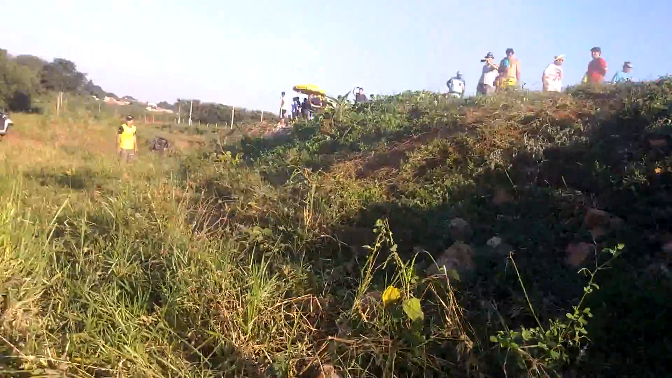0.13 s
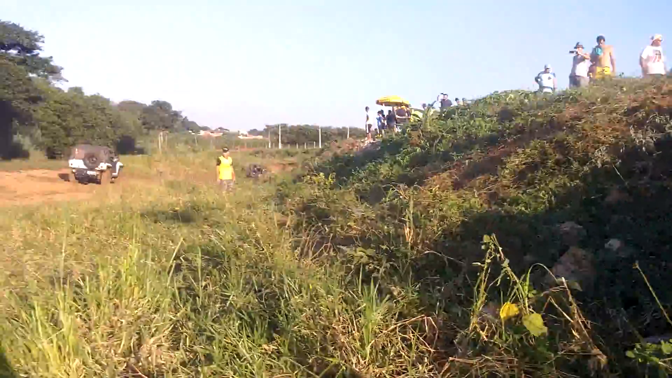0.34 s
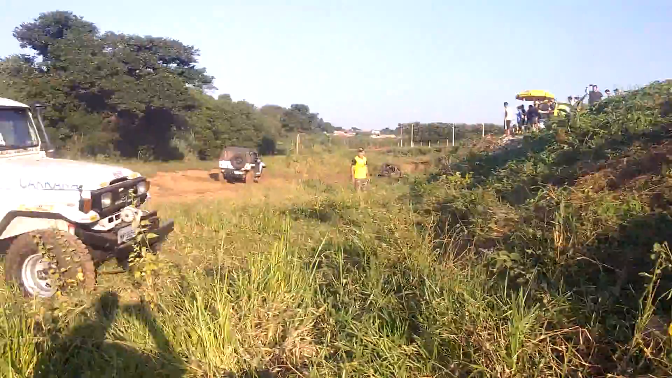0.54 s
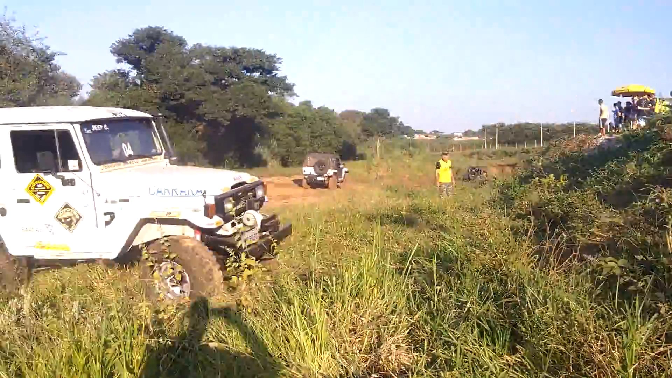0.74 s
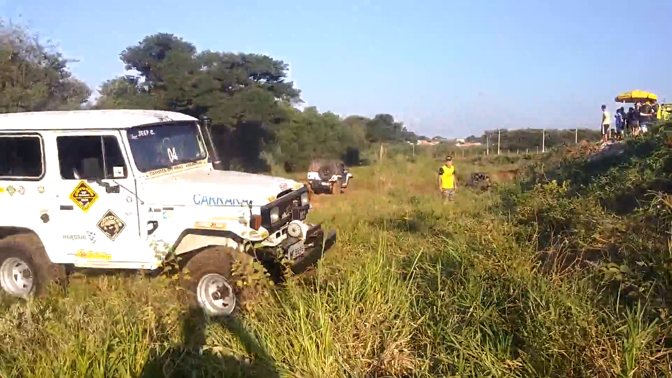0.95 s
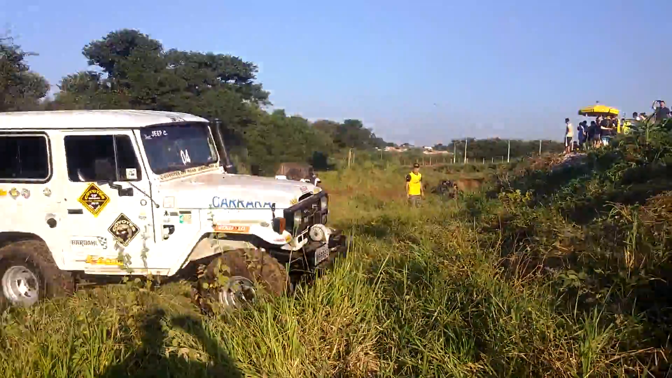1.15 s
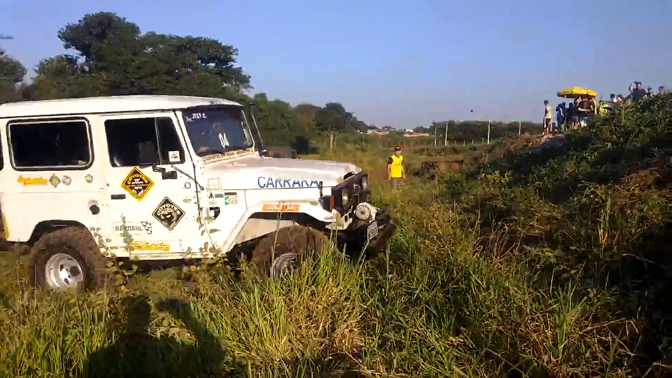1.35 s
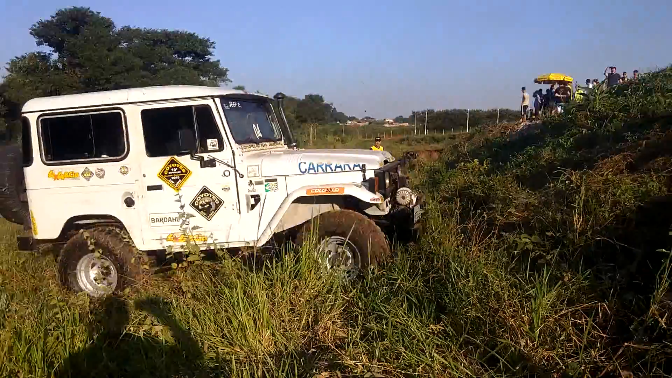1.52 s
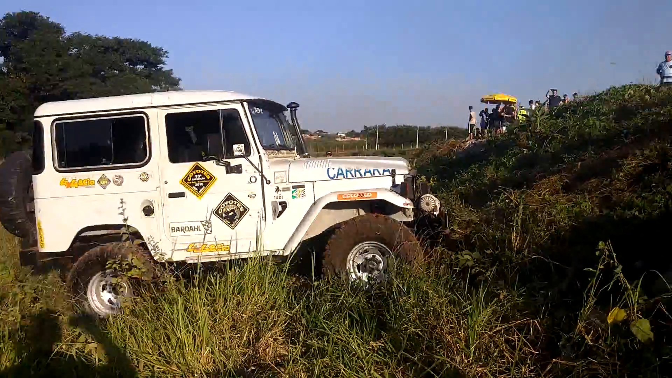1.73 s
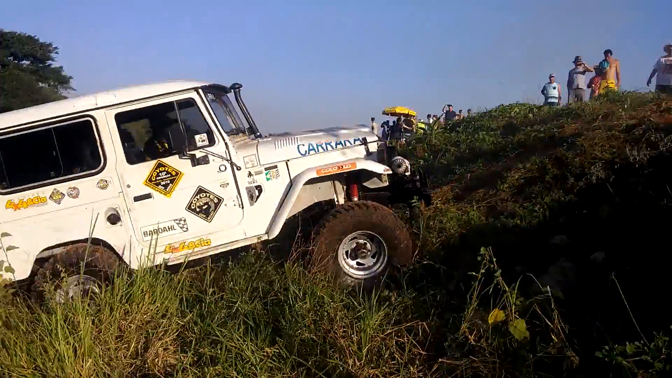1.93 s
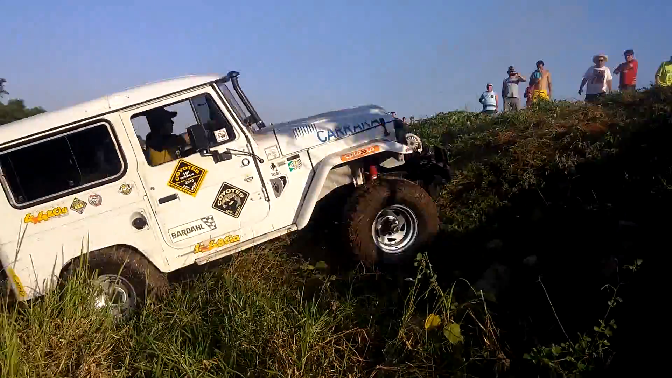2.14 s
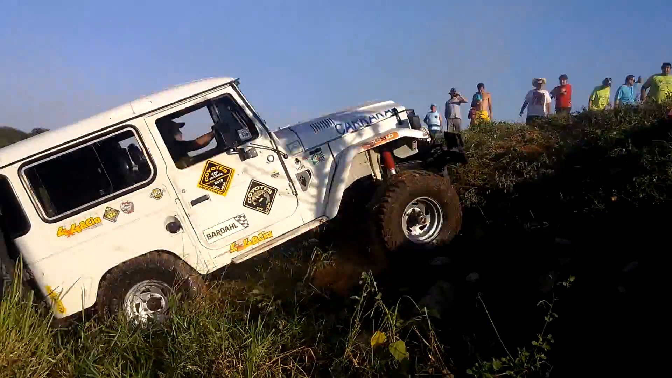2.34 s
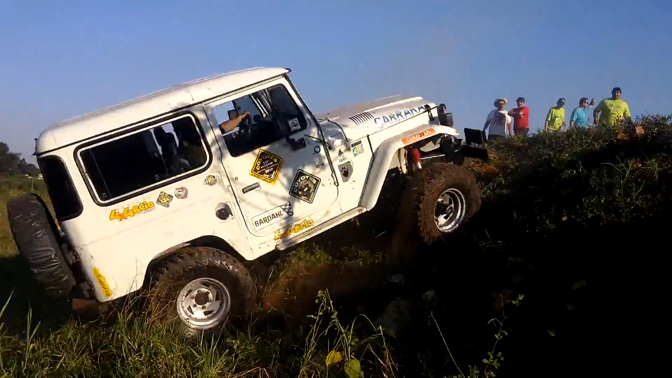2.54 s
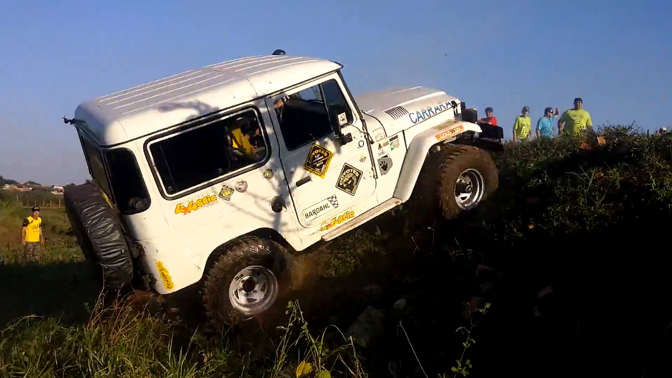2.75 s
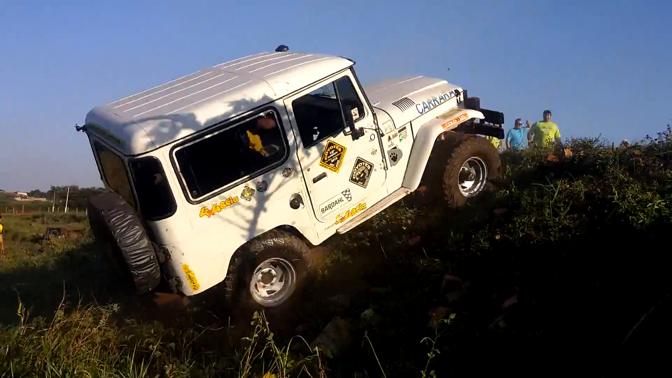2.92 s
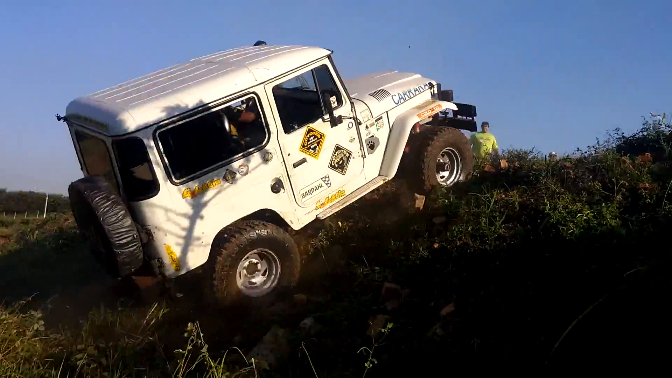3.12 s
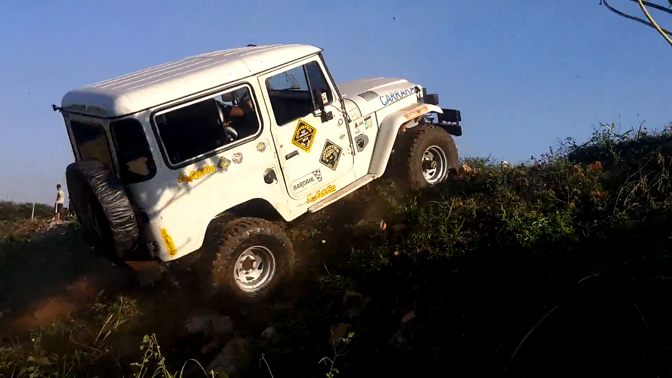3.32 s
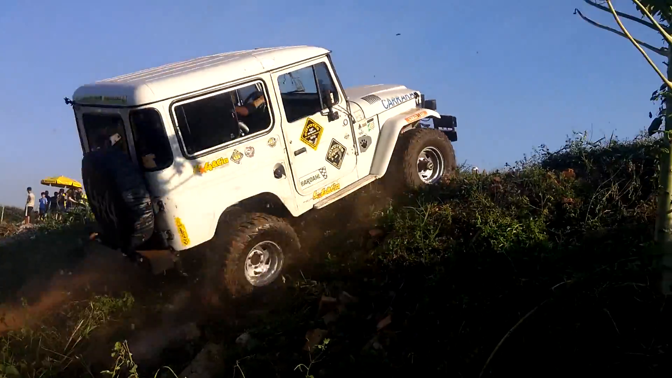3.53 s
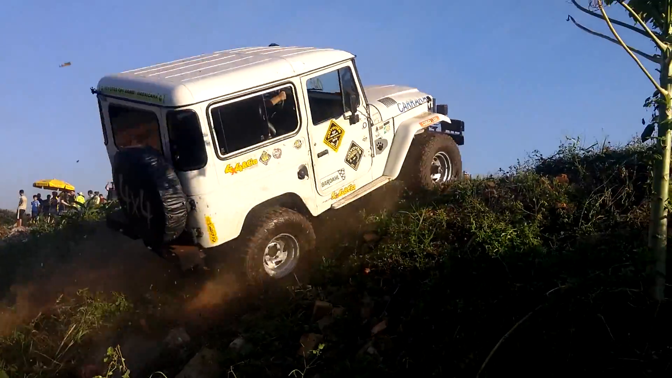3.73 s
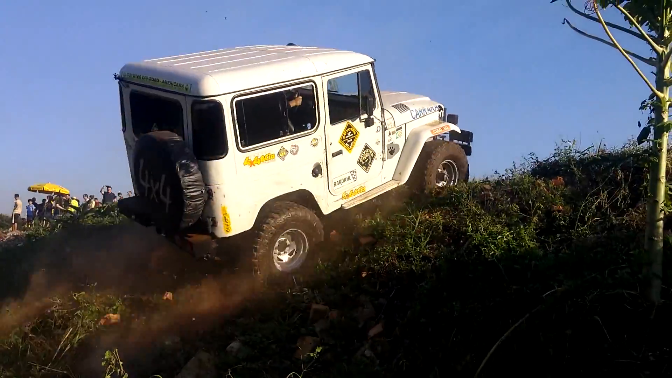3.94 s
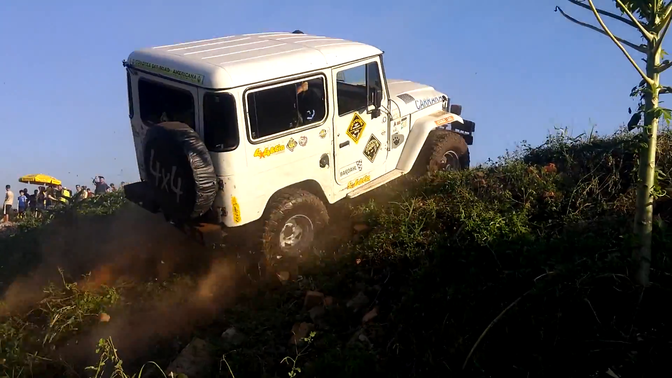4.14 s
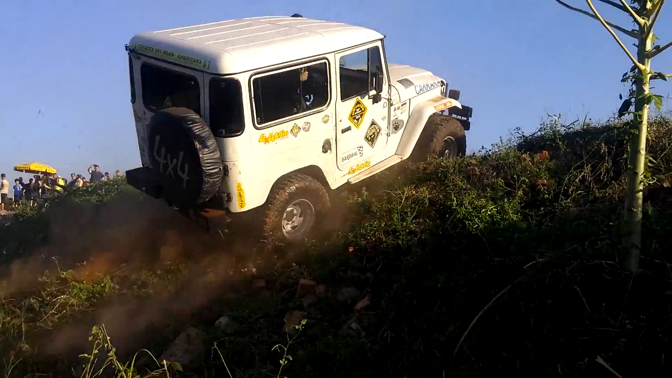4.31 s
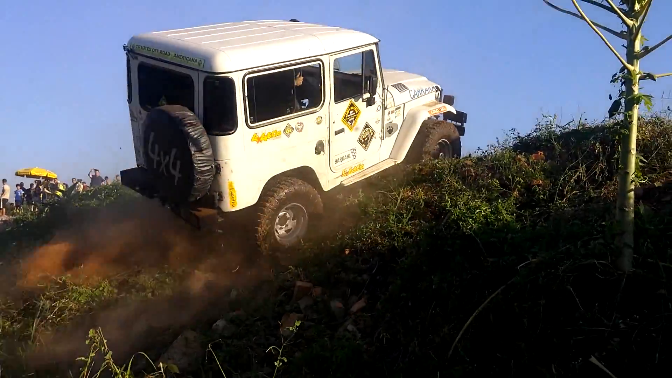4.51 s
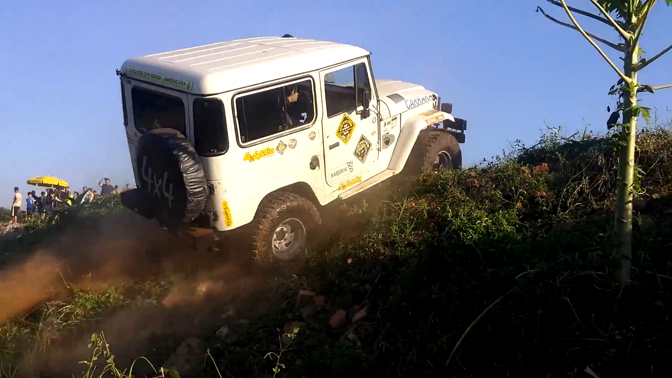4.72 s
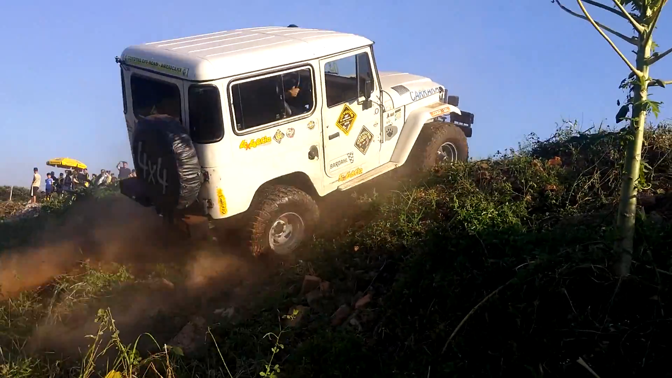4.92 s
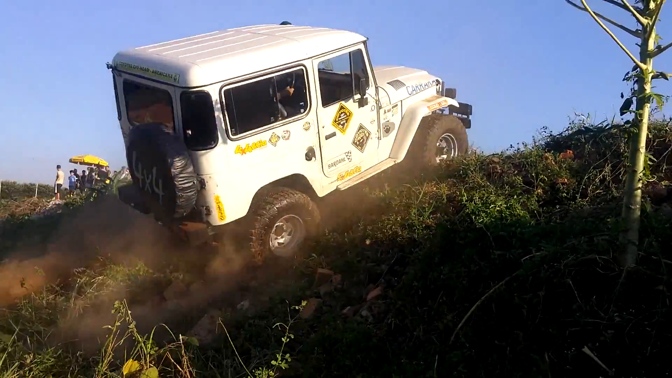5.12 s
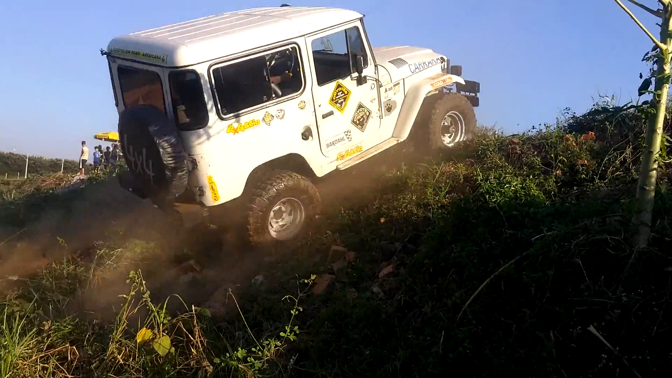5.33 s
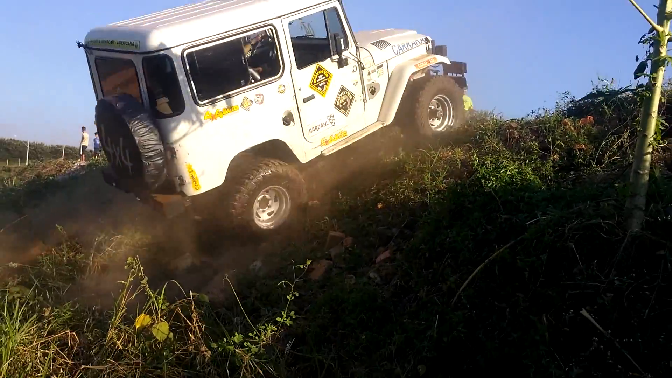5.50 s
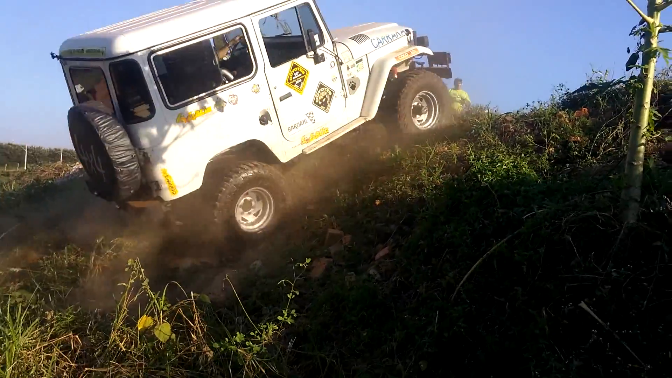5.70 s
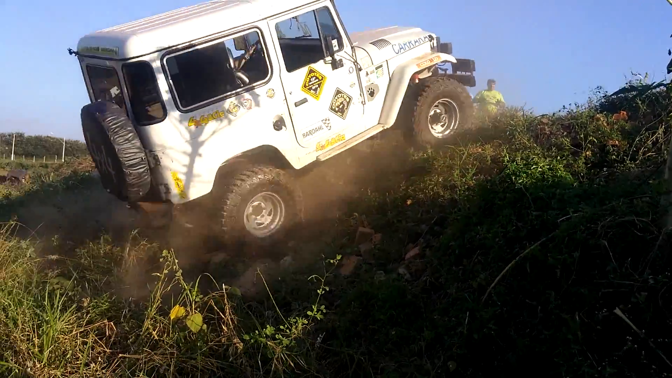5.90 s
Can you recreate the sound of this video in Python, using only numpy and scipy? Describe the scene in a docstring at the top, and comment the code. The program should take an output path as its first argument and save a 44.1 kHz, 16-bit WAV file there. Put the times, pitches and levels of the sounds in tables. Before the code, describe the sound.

Open air, close to the vehicle, with a slightly overloaded microphone and duller left side. At 0 s a short gust rumbles over a rough diesel at low revs; the boom stumbles near 0.2 s, then swells from 0.4 to 0.8 s with knocks, clatter and small snaps. Around 0.9 to 1.2 s revs and boom dip; hiss of fan, tyres and grass rises, strongest near 1.3 s. From 1.4 s the engine pulls hard, booming loudest around 1.8 s, with tiny squeaks at 1.75 and 2.07 s and snaps around 2 to 2.3 s. Pitch climbs until 3.1 s, while clatter recedes. A low thud at 3.17 s precedes bursts of earth drumming on panels, densest 3.5 to 3.9 s. Stones snap until 4.5 s over steady high revs. After a hiccup at 4.85 s the engine winds down, quiet and dull, its drone slightly returning by 6 s.

```python
"""Diesel off-roader climbing a dirt bank

A four-cylinder diesel off-roader passes close by and claws up a dirt bank outdoors.
Exhaust tones boom at multiples of the firing rate; coloured noises that flare at each firing make the
drone and clatter, a steady one the low roar, and damped pings the knocks. Fan, tyres and grass hiss, wind
rumbles on the microphone, thrown earth rings the panels, stones and stalks snap. The left of the two ports
is shadowed in the treble.
"""
import sys
import numpy as np
from scipy import signal
from scipy.fft import rfft, irfft, next_fast_len
from scipy.io import wavfile
from scipy.ndimage import uniform_filter1d, map_coordinates

SR = 44100
rng = np.random.default_rng(int(sys.argv[2]) if len(sys.argv) > 2 else 0)


def transcribe(signal):
    """Save signal, clipped to [-1, 1], as a 16-bit WAV file at the path in sys.argv[1]."""
    frames = np.atleast_2d(signal).T
    limited = np.clip(frames, -1, 1)
    pcm = np.round(limited * 32767).astype(np.int16)
    wavfile.write(sys.argv[1], SR, pcm)


N = 267246
TIME = np.arange(N) / SR  # s


def gain_of(db):
    """Amplitude factor of a level in dB."""
    return 10 ** (np.asarray(db) / 20)


def evened(x):
    """Scale a signal to an rms of 1."""
    return x / np.sqrt(np.mean(x ** 2) + 1e-20)


def read(points, hz):
    """Read a spectrum at the frequencies hz, interpolating along log frequency."""
    f, value = np.transpose(points)
    return np.interp(np.log(hz + 1), np.log(f + 1), value)


def columns(rows):
    """The columns of a time curve, read at every sample."""
    s, *rest = np.transpose(rows)
    return [np.interp(TIME, s, c) for c in rest]


def add(mix, s, sound):
    """Lay a sound into the mix at s seconds, cut at the end."""
    part = mix[:, round(s * SR):][:, :sound.shape[-1]]
    part += sound[..., :part.shape[1]]


def bursts(rows):
    """Level in dB of the loudest burst at every sample: quick rise, hold, steady fall."""
    rise = 2000  # dB per s
    levels = [db + np.minimum(0, np.minimum(rise * (TIME - s), fall * (s + hold - TIME)))
              for s, hold, db, fall in rows]
    return np.max(levels, 0)


# When each side of the vehicle faces the microphone: side: (from t/s, to t/s)
FACING = {"nose": (-.2, .8), "wing": (-.1, 1.6), "flank": (.85, 2.5), "tail": (4.7, 6.3),
          "underside": (.75, 3.6), "bonnet": (.78, 1.45), "grille": (.8, 1.35), "bumper": (.35, .9),
          "tailpipe": (5.68, 6.3), "rear wheel": (4.5, 5.55)}


def facing(side, s):
    """How fully a side faces the microphone, 0-1, with 0.15 s ramps."""
    start, end = FACING[side]
    return np.clip(np.minimum(s - start, end - s) / .15, 0, 1)


# How much of the vehicle is seen from behind, first less, then ever more: (t/s, share)
SEEN_FROM_BEHIND = [(0, 0.5), (.8, 0.074), (1.2, 0.54), (2, 0.69), (6.06, 1)]


def rear_share(s):
    """Share of the vehicle seen from behind, 0-1."""
    return np.clip(np.interp(s, *np.transpose(SEEN_FROM_BEHIND)), 0, 1)


# How near and hard-working the engine is: (t/s, body drone level/dB)
NEAR = [(0, -27.5), (.5, -25), (.82, -27), (.92, -26), (1.4, -22.5), (1.75, -24), (2.9, -33.5), (3.6, -33),
        (4.42, -37.5), (4.72, -37), (5.16, -45.5), (5.65, -50.5), (5.85, -44.5), (6.06, -41)]
LOUD_DB = -23  # the drone level that counts as near


def nearness():
    """Drone level in dB above the near level; the other engine layers follow it."""
    return columns(NEAR)[0] - LOUD_DB


# Panels and block ringing while their side faces us, and a band dipped by the ground echo (negative lift):
# (f/Hz, width/Hz, lift/dB, side)
RINGS = [(1188, 45, 9, "bumper"), (2350, 450, 13, "nose"), (2850, 600, 5, "bonnet"),
         (14800, 3000, 5, "bonnet"), (3300, 700, 5, "underside"), (880, 60, 6, "wing"),
         (1315, 45, 6, "wing"), (6000, 2500, 5, "nose"), (1735, 60, 6, "nose"), (1915, 45, 8, "wing"),
         (762, 45, 6, "flank"), (1455, 60, 5, "flank"), (680, 170, 7, "tail"), (1930, 70, 8, "rear wheel"),
         (1800, 1600, 6, "tailpipe"), (310, 80, 5, "tail"), (1480, 60, 6, "tail"),
         (440, 140, -7, "underside")]


def noise(colour, patchy_db, ring=False, size=1024):
    """Two unrelated noises with drifting patches; the colour turns from front to rear, rings come and go."""
    frames, hz = N * 4 // size + 5, np.fft.rfftfreq(size, 1 / SR)
    a, b, c, d, patches = rng.standard_normal((frames, len(hz), 5)).T
    s, colour = np.arange(frames) * size / 4 / SR, np.array(colour)
    rear = rear_share(s)
    front_db = read(colour[:, :2], hz)[:, None]
    rear_db = read(colour[:, [0, -1]], hz)[:, None]  # the front colour again if there is only one
    db = front_db * (1 - rear) + rear_db * rear

    # the rings wander slowly at random in pitch and strength
    drift, swell = .005, .25  # shares
    wander = rng.standard_normal((frames, len(RINGS), 2))
    wander = evened(uniform_filter1d(wander, size=16384 // size, axis=0))
    for k, (f, width, lift_db, side) in enumerate(RINGS if ring else []):
        off = (hz[:, None] - f * (1 + drift * wander[:, k, 0])) / (width / 2)
        lift = lift_db * (1 + swell * wander[:, k, 1]) * facing(side, s)
        db = db + lift / (1 + off ** 2)

    shape = gain_of(db) / np.sqrt(np.mean(gain_of(2 * db), 0))  # same power in every frame
    patches = uniform_filter1d(patches, size=9216 // size, axis=1)
    patches = evened(uniform_filter1d(patches, size=size // 100, axis=0))
    z = np.array([a + 1j * b, c + 1j * d]) * shape * gain_of(patchy_db * patches)
    return evened(signal.istft(z, nperseg=size, noverlap=size * 3 // 4)[1][:, :N])


# Gusts: (t/s, hold/s, level/dB, fall/dB per s)
GUSTS = [(-.1, 0.071, -18, 38), (1.45, 0.96, -33.5, 102)]
# Colour of the wind: (f/Hz, level/dB per Hz)
WIND_COLOUR = [(2, 0.5), (20, -10.5), (32, 14), (45, -29), (300, -98)]


def wind():
    """Wind on the microphone: deep patchy noise, gusting over a steadily calming floor."""
    floor_db, calming = -32, -18  # dB at the start, dB per s
    level_db = np.maximum(bursts(GUSTS), floor_db + calming * TIME)
    return gain_of(level_db) * noise(WIND_COLOUR, 5, size=4096)


# Hiss, rising in steps as the flank comes by: (t/s, level/dB)
HISS = [(0, -43), (.15, -53.5), (.4, -77), (.42, -49.5), (.72, -44), (.84, -44), (.88, -36), (1.3, -31),
        (2, -40), (2.9, -49.5), (3.3, -50.5), (3.55, -46), (4.8, -53), (5.1, -61.5), (5.35, -76),
        (6.06, -71.5)]
# Colour of the hiss: (f/Hz, front level/dB per Hz, rear level/dB per Hz)
HISS_COLOUR = [(2500, -44, -51), (4100, -12.5, -38), (4770, 0.5, -18), (6000, 2.5, -9), (7820, 9.5, -1),
               (9900, 19, 5.5), (10320, 3, 7.5), (14000, -20.5, -17.5), (15800, -21.5, -21.5)]


def hiss(flare):
    """Fan, tyres and grass: bright noise, slightly pulsed by the firing."""
    return gain_of(columns(HISS)[0]) * noise(HISS_COLOUR, 1.6, ring=True, size=256) * evened(1 + .6 * flare)


# A clod on the underside: (t/s, level before attack and decay/dB, f/Hz, t60/s)
THUMP = (3.165, -15, 205, .11)


def thump():
    """A clod thuds on the underside: one low, quickly damped ring."""
    s, db, hz, t60 = THUMP
    t, out = np.arange(6000) / SR, np.zeros((2, N))
    attack = np.minimum(t / 0.0044, 1)
    add(out[:1], s, attack * gain_of(db - 60 * t / t60) * np.sin(2 * np.pi * hz * t))
    return out


# Throws of earth from the spinning wheel: (t/s, hold/s, level/dB, fall/dB per s)
SPRAY = [(3.172, 0.011, -43, 147), (3.474, .04, -29.5, 203), (3.519, 0.036, -22.5, 298),
         (3.598, 0.044, -28, 198), (3.789, 0.13, -31, 119), (4.211, 0.008, -36, 600),
         (4.362, 0.005, -39, 600), (3.678, 0.078, -32, 200)]
# Dull modes of the panels: (f/Hz, width/Hz, level/dB)
PANEL = [(270, 120, -4), (430, 160, -3), (690, 110, 0), (1480, 500, 6)]


def spray():
    """The spinning wheel throws clods of all sizes, which ring the damped modes of the panels."""
    t, clods_per_s = np.arange(1500) / SR, 450
    grid = (len(PANEL), 2, N)
    clods = gain_of(3 * rng.standard_normal(grid)) * (rng.random(grid) < clods_per_s / SR)
    starts = np.round(np.array(SPRAY)[:, 0] * SR).astype(int)
    clods[..., starts + 40] = gain_of(10)  # a large clod opens each throw
    rung = 0
    for hits, (hz, width, db) in zip(clods, PANEL):
        mode = np.minimum(t / 0.00093, 1) * np.exp(-np.pi * width * t) * np.sin(2 * np.pi * hz * t)
        rung = rung + signal.oaconvolve(hits, gain_of(db) * mode[None])
    return gain_of(bursts(SPRAY)) * evened(rung[:, :N])


# Stones and stalks against the body: (t/s, onset level/dB, t60/s, tilt from 3 to 12 kHz/dB)
SNAPS = [(.409, -32.5, 0.021, -6), (.58, -38, 0.055, 6), (.638, -36, 0.072, 9), (0.7142, -30, 0.076, 1),
         (2, -31, 0.14, -19), (2.09, -27, 0.034, -30), (2.297, -26, 0.047, -46), (3.1715, -32, 0.073, -14),
         (3.911, -35.5, 0.058, -33), (4.0232, -27.5, 0.012, -23), (4.1, -36.5, 0.29, -23),
         (4.279, -36.5, 0.08, -8), (4.521, -32, 0.032, 23), (4.532, -35, 0.082, -14)]


def snaps():
    """Stones and stalks snap as short wide noise bursts; fine grit ticks at random."""
    t, out, hz = np.arange(3000) / SR, np.zeros((2, N)), np.linspace(0, SR / 2, 65)
    tail = gain_of(-17 - 60 * t / .12)  # scattered by the ground
    colour = [(700, -54), (3000, 10.5), (5000, -6.5), (9500, 15), (12500, -0.5), (16000, -26)]  # f/Hz, dB
    grit = [(s, db, .01, 0) for s, db in rng.uniform([0, -46], [4.6, -41.25], (60, 2))]
    for s, db, t60, tilt_db in SNAPS + grit:
        colour_db = read(colour, hz) + tilt_db / 2 * np.log2((hz + 500) / 6000)
        bright = signal.firwin2(65, hz, gain_of(colour_db), fs=SR)
        burst = evened(signal.lfilter(bright, 1, rng.standard_normal((2, len(t)))))
        add(out, s, (gain_of(db - 60 * t / t60) + gain_of(db) * tail) * burst)
    return out


# Short squeaks: (t/s, peak level/dB, f/Hz)
SQUEAKS = [(1.749, -29, 8160), (2.069, -33, 7770)]


def squeaks():
    """Brief high sine tones that swell and fade within about 20 ms."""
    t, out = np.arange(900) / SR, np.zeros((2, N))
    for s, db, hz in SQUEAKS:
        add(out, s, gain_of(db) * np.sin(2 * np.pi * hz * t) * np.hanning(900))
    return out


# Colour of the roar: (f/Hz, level/dB per Hz)
ROAR_COLOUR = [(10, -27.5), (25, -54), (50, 6.5), (120, 8.5), (200, 1.5), (340, -18), (450, -37),
               (16000, -50.5)]


def roar():
    """Low engine noise, 4 dB weaker when the wing does not face us."""
    level_db = -20 + 0.59 * nearness() - 4 * (1 - facing("wing", TIME))
    return gain_of(level_db) * noise(ROAR_COLOUR, 1.23, size=4096)


# Colour of the drone: (f/Hz, front level/dB per Hz, rear level/dB per Hz)
DRONE_COLOUR = [(150, -49.5, -32.5), (230, -37.5, 10), (348, -3, -1), (490, -5, -3), (545, -7, 3.5),
                (890, -5.5, -2.5), (1188, -2, -20), (1550, -41.5, -36.5)]


def drone(flare):
    """The body drones: midrange noise flaring at each firing."""
    body = noise(DRONE_COLOUR, 1.8, ring=True, size=2048)
    return gain_of(LOUD_DB + nearness()) * body * evened(1 + 1.1 * flare)


# Colour of the clatter: (f/Hz, front level/dB per Hz, rear level/dB per Hz)
CLATTER_COLOUR = [(610, -79, -27), (920, -31, -7), (1210, -2, -3), (1840, 0.5, -8.5), (2164, -17.5, -5.5),
                  (2610, -28, -9.5), (3404, -47, -12.5), (4620, -26, -40), (5550, -34, -64.5)]


def clatter(flare):
    """The block clatters: brighter noise with the strongest flares."""
    block = noise(CLATTER_COLOUR, 1.3, ring=True, size=2048)
    return gain_of(-23 + 1.246 * nearness()) * block * evened(1 + 1.6 * flare)


# Modes of the block rung by the firing: (f/Hz, width/Hz, level at the near drone level/dB, side)
KNOCKS = [(1780, 100, -24.5, "grille"), (1740, 90, -25, "nose"), (1315, 80, -23, "bumper"),
          (880, 80, -28, "wing"), (1460, 140, -32, "flank"), (700, 130, -29, "tail"),
          (1930, 90, -39, "rear wheel")]


def knocks(beat):
    """Each firing knocks the block, a weaker valve tap follows half a period later; every mode pings."""
    tap_db, second_db, spread_db = -5, -5, 2.5  # valve tap; every second firing is softer; random spread
    lag = .25  # share of a firing period
    beat = beat + 1 - lag
    at = np.flatnonzero(np.diff((2 * beat).astype(int)) > 0)  # every half period
    t, out = np.arange(1200) / SR, np.zeros((2, N))
    grid = (2, len(KNOCKS), len(at))
    blow_db = tap_db * (beat[at + 1] % 1 >= .5) + second_db * (beat[at + 1] % 2 >= 1)
    sizes = gain_of(blow_db + spread_db * rng.standard_normal(grid))
    signs = rng.choice([-1., 1.], grid)  # random polarity of each blow, so the knocks stay rough
    for k, (hz, width, db, side) in enumerate(KNOCKS):
        blows = np.zeros((2, N))
        blows[:, at] = sizes[:, k] * signs[:, k]
        ping = np.minimum(t / 0.0021, 1) * np.exp(-np.pi * width * t) * np.sin(2 * np.pi * hz * t)
        rung = evened(signal.oaconvolve(blows, ping[None])[:, :N])
        out += gain_of(db + nearness()) * facing(side, TIME) * rung
    return out


# Exhaust: (t/s, firing rate f/Hz, boom level/dB rms, octave level/dB rms), levels before any stumble
EXHAUST = [(0, 37.53, -29, -17.5), (.1, 41, -30, -9), (.36, 50.15, -26, -18.5), (.47, 51.24, -16, -11),
           (.6, 52.73, -12.5, -16), (.8, 54.37, -11.5, -12.5), (.83, 50.54, -12.5, -18),
           (.88, 44.76, -35, -19.5), (1.05, 44.27, -33, -15), (1.18, 45.17, -32, -24.5),
           (1.28, 47.82, -25, -10.5), (1.35, 49.4, -18.5, -24), (1.48, 53.67, -10, -14.5),
           (1.62, 57.64, -8, -25), (1.81, 64.04, -5, -20.5), (2.03, 65.7, -7.5, -22), (2.44, 80, -7, -19),
           (2.62, 72.7, -9, -21), (3.11, 87.6, -10.5, -24), (3.23, 84.9, -10, -21.5),
           (3.53, 89.5, -10, -25.5), (3.92, 84.86, -11, -20.5), (4.07, 87.32, -12, -23.5),
           (4.49, 83.67, -12.5, -21.5), (4.72, 92.3, -13.5, -26.5), (4.83, 90.65, -12, -27.5),
           (4.88, 88.4, -13.5, -40.5), (5.12, 80.46, -17.5, -35.5), (5.32, 72.9, -23.5, -33.5),
           (5.63, 61.1, -22.5, -37.5), (6.06, 49.3, -25.5, -20.5)]
# Pipe strength at the pitch of multiples 3 and 4: (f/Hz, level/dB rms before nearness and waver)
PIPE = [(110, -22), (135, -23), (150, -21), (163, -19), (176, -26), (195, -33), (215, -39.5), (300, -45)]


def exhaust(turns, sag):
    """Clean tones at 1, 2, 3, 4 and 1.5 times the firing rate; unequal cylinders make the 1.5."""
    hz, *tones_db = columns(EXHAUST)
    wander = uniform_filter1d(uniform_filter1d(rng.standard_normal(N), size=2500), size=2500)
    wander = evened(wander)
    overtone_db = -0.15 + 0.88 * nearness()
    waver_db = 2.4 * (1.3 - rear_share(TIME))  # more from the front
    for k in (3, 4):
        tones_db.append(overtone_db + read(PIPE, k * hz) + waver_db * np.roll(wander, k * SR))
    late = np.clip((TIME - 5.3) / .04, 0, 1)  # late in the slowing, the uneven tone drops by 3 dB
    tones_db.append(-33 - 3 * late + 2 * wander + 7.5 * facing("nose", TIME))  # louder from the front

    tones = 0
    for k, lag, db in zip((1, 2, 3, 4, 1.5), (0, -.7, 2.4, -1.5, 0), tones_db):
        tones = tones + gain_of(db) * np.sqrt(2) * np.cos(2 * np.pi * k * turns - lag)
    ground = .6 * np.roll(tones, 130)  # the ground returns the tones weaker and 3 ms late
    return sag * np.array([tones, ground])


# The boom sags and slips out of step: (t/s, slip as a share of a firing period)
STUMBLES = [(0.171, 0.352), (4.849, 0.304)]


def firing():
    """Count of firing periods at every sample, and the gain that sags at each stumble."""
    turns, sag = np.cumsum(columns(EXHAUST)[0]) / SR, 1
    for s, slip in STUMBLES:
        passed = np.clip((TIME - s) / 0.065 + .5, 0, 1)
        turns = turns + slip * passed
        sag = sag * (1 - 0.6 * np.sin(np.pi * passed))
    return turns, sag


def flares(beat):
    """Sharp rise and decay at each firing, by a different amount each time, weaker from behind."""
    strength = gain_of(1.5 * rng.standard_normal(N // 400))[beat.astype(int)]
    pulses = uniform_filter1d(strength * np.exp(-(beat % 1) / 0.45), size=60)
    return pulses * (1.25 - 0.45 * rear_share(TIME))


def scene():
    """Row 0 is the direct sound, row 1 the sound scattered by ground and grass."""
    turns, sag = firing()
    beat = np.maximum(turns + 0.1701, 0)  # the flare starts just before the pressure peak
    flare = flares(beat)
    surroundings = wind() + hiss(flare) + thump() + spray() + snaps() + squeaks()
    engine = roar() + drone(flare) + clatter(flare) + knocks(beat) + exhaust(turns, sag)
    return surroundings + engine


# Left port against right: (f/Hz, level/dB)
LEFT_DB = [(50, 1.5), (85, 0), (290, .3), (640, -3.5), (1410, -12), (3100, -13), (5500, -3.5), (8500, -24),
           (15000, -24.5)]
# Likeness of the ports: (f/Hz, likeness 0-1)
SAME = [(60, .99), (300, .96), (600, .95), (1200, .86), (2400, .65), (4500, .2), (15000, .1)]
# Delay of the left port: (t/s, lag/ms)
LEFT_LAG = [(0, -.22), (.7, -.08), (1.7, .07), (3.2, .14), (4.7, .14), (6.06, .06)]


def record(dry):
    """The left port hears duller and, in the treble, mostly scattered sound; soft overload; band limit."""
    size = next_fast_len(N + SR // 10)
    hz = np.fft.rfftfreq(size, 1 / SR)
    moments = np.arange(N) - columns(LEFT_LAG)[0] * SR / 1000
    late = map_coordinates(dry[0], [moments], order=3, mode="nearest")
    direct, delayed, scattered = rfft([dry[0], late, dry[1]], size)
    same, shade = np.clip(read(SAME, hz), 0, 1), gain_of(read(LEFT_DB, hz))
    left = shade * (same * delayed + np.sqrt(1 - same ** 2) * scattered)
    mean_gain = np.sqrt(1 + shade ** 2 + 2 * shade * same) / 2  # levels refer to the mean of both ports
    ports = irfft(np.array([left, direct]) / mean_gain, size)[:, :N]
    ports = ports / (1 + (ports / .95) ** 6) ** (1 / 6)
    band_limit = signal.firwin(511, 15800, window=("kaiser", 9), fs=SR)
    return signal.oaconvolve(ports, band_limit[None], "same")


dry = scene()
out = record(dry)
transcribe(out)
```